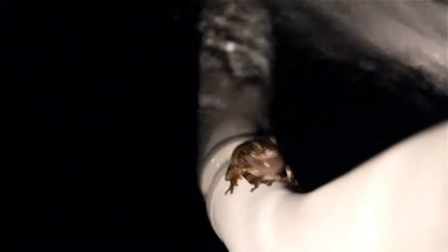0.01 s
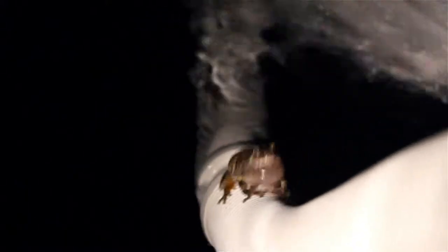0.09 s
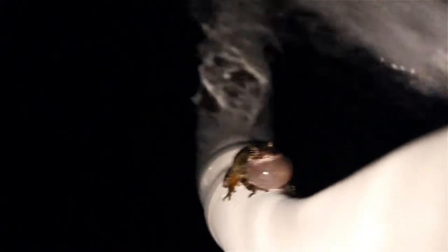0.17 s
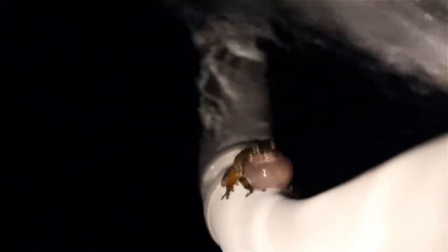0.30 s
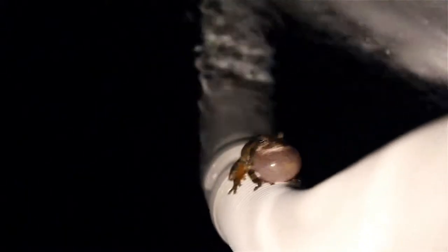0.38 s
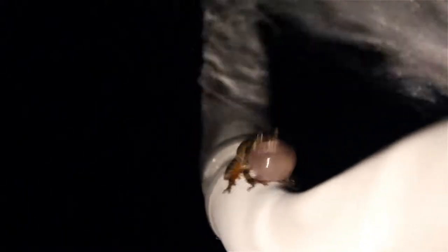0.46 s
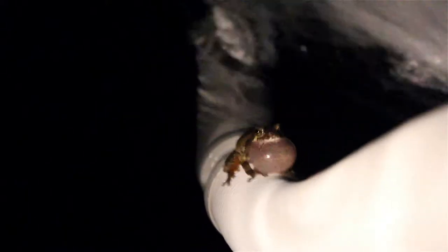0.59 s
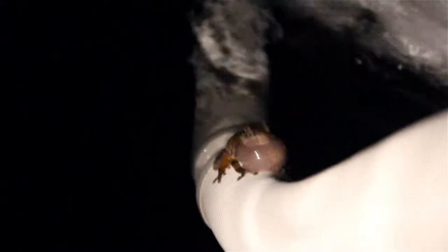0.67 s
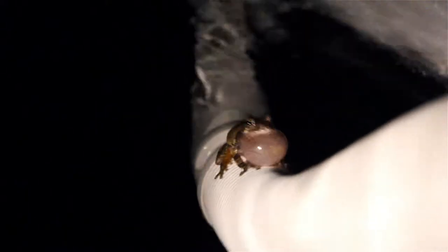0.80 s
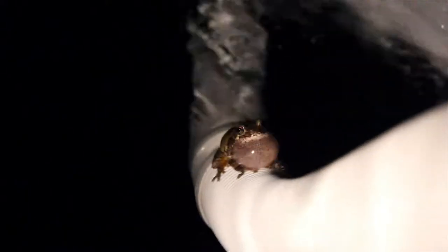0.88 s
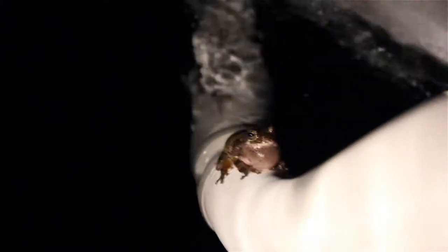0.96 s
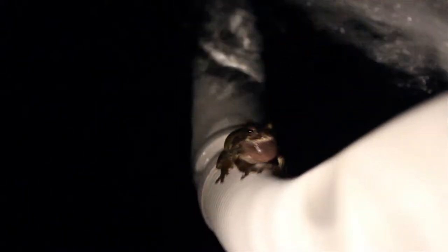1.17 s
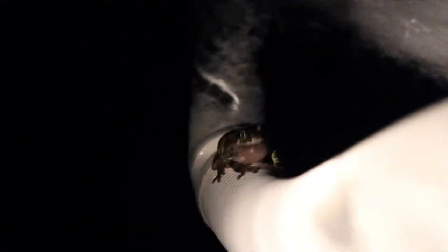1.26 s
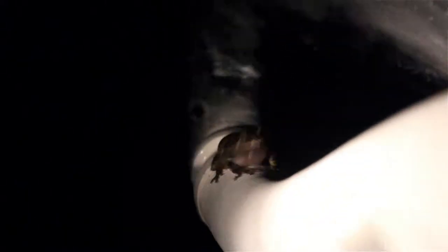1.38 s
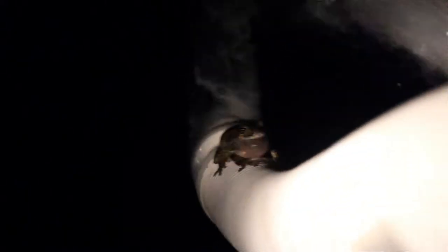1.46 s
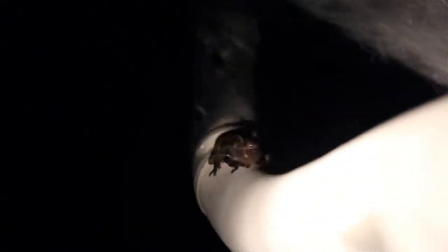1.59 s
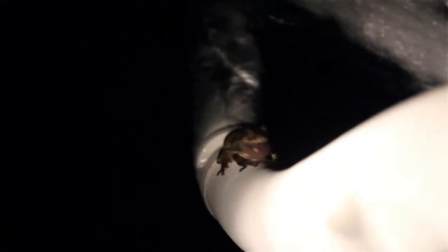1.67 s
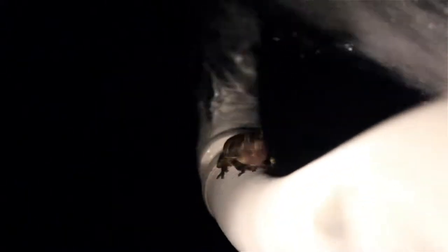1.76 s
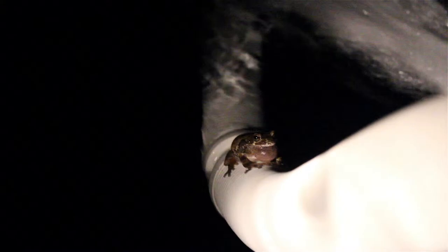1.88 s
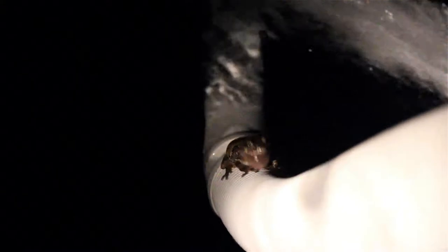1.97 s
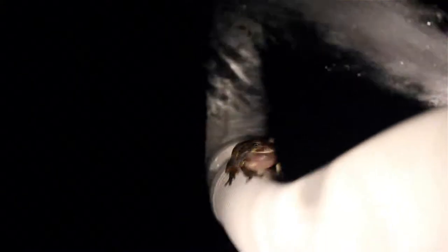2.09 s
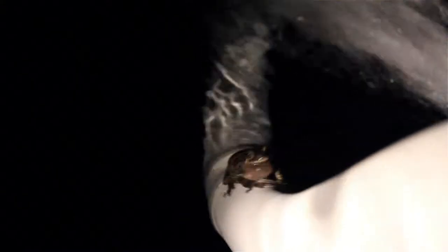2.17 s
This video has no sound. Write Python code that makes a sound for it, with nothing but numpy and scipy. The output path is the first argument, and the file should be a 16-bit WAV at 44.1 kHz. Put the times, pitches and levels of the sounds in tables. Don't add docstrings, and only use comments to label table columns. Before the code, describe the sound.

Two frogs give dry, buzzing, tonal trills that overlap for under a second, the nearer one louder and ending earlier; afterwards only bubbling water and a very faint low hum remain, outdoors, with little echo.

```python
import sys
import numpy as np
from scipy import signal
from scipy.fft import rfft, irfft
from scipy.io import wavfile
from scipy.ndimage import uniform_filter1d, map_coordinates

SR = 44100
rng = np.random.default_rng(int(sys.argv[2]) if len(sys.argv) > 2 else 0)


def wav_out(sig):
    wavfile.write(sys.argv[1], SR, np.round(np.clip(np.atleast_2d(sig).T, -1, 1) * 32767).astype(np.int16))


def amplitude_ratio(level_db):
    exponent = np.asarray(level_db, float) / 20
    return 10 ** exponent


N = 97020


def unit(x):
    return x / np.sqrt(np.mean(x ** 2) + 1e-20)


def wobble(rate):
    knots = rng.standard_normal(int(N * rate / SR) + 4)
    return map_coordinates(knots, [np.arange(N) * rate / SR])


def laid(start_s, rows):
    at = np.round(start_s * SR).astype(int)[:, None] + np.arange(rows.shape[1])
    return np.bincount(at.ravel(), rows.ravel(), N + SR)[:N]


# frequency in Hz, spectral level in dB.
RUSH_SPECTRUM = [(25, -21), (75, -8.5), (400, -4.5), (580, 0), (1650, 0.5), (3600, -4), (8000, -16),
                 (15800, -22.5)]


def rush():
    patchy_db, level_db, swell_db = 1.5, -39.5, 0.08
    _, _, z = signal.stft(rng.standard_normal(N + 512), SR, nperseg=512)
    field = uniform_filter1d(rng.standard_normal(z.shape), size=5, axis=0)
    field = uniform_filter1d(field, size=8, axis=1)
    patchy = signal.istft(z * amplitude_ratio(patchy_db * unit(field)), nperseg=512)[1][:N]
    f, tone_db = np.transpose(RUSH_SPECTRUM)
    log_hz = np.log(np.fft.rfftfreq(N, 1 / SR) + 1)
    shaped = irfft(rfft(patchy) * amplitude_ratio(np.interp(log_hz, np.log(f + 1), tone_db)), N)
    return amplitude_ratio(level_db + swell_db * (wobble(2.4) + wobble(11.7))) * unit(shaped)


def bubbles(s, db, hz, cycles):
    turns = np.arange(SR // 25) / SR * hz[:, None]
    life = turns / np.reshape(cycles, (-1, 1))
    swell = 2.43 * 3 * life * np.exp(-3 * life)
    ring = np.sin(2 * np.pi * turns * (1 + 0.034 * life))
    return laid(s, amplitude_ratio(db)[:, None] * swell * ring)


def swarm(hz, spread, db, tail_db, cycles, count):
    luck = rng.random((count, 4))
    normal = np.sqrt(-2 * np.log(luck[:, 1])) * np.cos(2 * np.pi * luck[:, 2])
    pitch = np.clip(hz * np.exp(spread * normal), 540, SR / 3)
    level_db = db + tail_db * np.minimum(-np.log(luck[:, 3]), 3)
    return bubbles(luck[:, 0] * N / SR, level_db, pitch, cycles)


# start in seconds, peak level in dB, pitch in Hz, ring in cycles.
SINGLE_DROPS = [(.037, -33.5, 694, 4.1), (1.131, -34, 552, 9.5), (1.1325, -32, 1490, 3.5),
                (1.134, -36, 2700, 6), (1.158, -31, 550, 11), (1.266, -34.5, 1410, 7.5),
                (1.345, -35, 1624, 13), (1.357, -38, 757, 12), (1.48, -31, 1480, 6.8),
                (1.762, -37, 539, 15), (1.765, -34, 750, 5.8), (2.072, -34, 3190, 12),
                (1.715, -32.5, 4020, 6.4), (1.462, -34, 7550, 7.5), (1.821, -31, 10000, 3),
                (1.859, -35, 5300, 6), (1.992, -32.5, 5460, 7.7), (2.003, -38, 9100, 9),
                (0.6145, -34, 14700, 12), (.6147, -42, 11800, 9), (.676, -43, 14600, 12),
                (.6335, -43, 14600, 12), (.634, -33, 6530, 2.7), (.6515, -38, 10500, 5),
                (.663, -42, 12500, 5), (.04, -47, 578, 18), (.2595, -40, 14400, 12), (.30, -42, 12500, 10),
                (1.8845, -40, 11600, 6), (1.7248, -41, 14300, 16), (1.9573, -45, 13800, 12),
                (2.0745, -43, 13700, 9), (2.19, -43, 13500, 8), (1.823, -38, 12500, 6),
                (.9265, -43, 10000, 8), (.553, -37, 6000, 8), (2.052, -39, 8500, 12)]


def water():
    round_bubbles = swarm(1200, spread=.55, db=-51, tail_db=2.2, cycles=10, count=400)
    fizz = swarm(5500, spread=.45, db=-49, tail_db=2.6, cycles=6, count=300)
    spit = swarm(11500, spread=.25, db=-54, tail_db=3.8, cycles=9, count=120)
    return rush() + bubbles(*np.transpose(SINGLE_DROPS)) + round_bubbles + fizz + spit


# frequency in Hz, level in dB rms.
HUM_TONES = [(120.3, -62), (292.6, -59), (358, -73), (422.6, -67), (219, -67)]


def hum():
    t = np.arange(N) / SR
    return sum(amplitude_ratio(db + 3 + 0.81 * wobble(7.9)) * np.sin(2 * np.pi * hz * t + .6 * wobble(8))
               for hz, db in HUM_TONES)


def train(knots, every):
    s, db = np.transpose(knots)
    index = np.arange(len(s))
    place = np.arange((len(s) - 1) * every + 1) / every
    return np.interp(place, index, s), np.interp(place, index, db)


def pulses(s, db, hz, glide, rise_s, fall_s, parts, air_db=-120, low_db=0):
    jitter_s, scatter_db, detune = .00025, .6, .007
    fullness = 1.05
    luck = rng.standard_normal((len(s), 7))
    t = np.arange(-SR // 50, SR // 50) / SR
    rises_s = rise_s * amplitude_ratio(0.35 * luck[:, 3:4])

    def shape(u):
        place = np.clip(np.where(u < 0, u / rises_s, u / fall_s), -1, 1)
        return np.abs(np.cos(np.pi / 2 * place)) ** fullness

    waver = uniform_filter1d(rng.standard_normal((len(s), len(t))), size=60, axis=1)
    waver = .1 * unit(waver)
    off_pitch = detune * luck[:, :1]
    phase = 2 * np.pi * hz * (1 + off_pitch) * (t + glide * t * t / 2) + 9 * luck[:, 4:5] + waver / 2
    tone = 0
    for k, part_db, lag_s in parts:
        level_db = part_db + 0.5 * luck[:, 5:6] * (k != 2) + np.reshape(low_db, (-1, 1)) * (k == 1)
        tone = tone + amplitude_ratio(level_db) * np.sin(k * phase) * shape(t - lag_s) ** (1 + (k > 2))

    whistle_phase = 2 * np.pi * 8520 * t * (1 + 2 * t + off_pitch / 2) + 4 * waver
    whistle = amplitude_ratio(-34 + luck[:, 6:]) * np.sin(whistle_phase) * shape((t + .001) / 1.3) ** 2
    hiss = uniform_filter1d(rng.standard_normal(tone.shape), size=5, axis=1)
    breath = amplitude_ratio(-24.5) * shape(t) * hiss
    air = amplitude_ratio(np.reshape(air_db, (-1, 1))) * (whistle + breath)
    level = amplitude_ratio(db + scatter_db * luck[:, 2])[:, None]
    return laid(s + t[0] + jitter_s * luck[:, 1], level * (tone + air))


def echoes(x, wet_db):
    t = np.arange(SR // 8) / SR
    tail = rng.standard_normal(len(t)) * amplitude_ratio(-60 * t / .035)
    return x + amplitude_ratio(wet_db) * signal.fftconvolve(x, tail / np.linalg.norm(tail))[:N]


# time in seconds, peak level in dB.
FAR_CALL = [
    (.071, -58),
    (.193, -27.5),
    (.3165, -19),
    (.443, -20),
    (.572, -21),
    (.704, -20.5),
    (.836, -20),
    (.9702, -20),
    (1.107, -19.5),
]
# multiple of the pitch, level in dB, lag in seconds.
FAR_HARMONICS = [(1, -16, .001), (2, 0, 0), (3, -32, 0)]
# time in seconds, level in dB.
SECOND_PULSE_LEVEL = [(.3, -3.5), (.4, -1)]


def far_frog():
    s, db = train(FAR_CALL, every=6)
    s[-1] += .0018
    fall_s = .0032
    first = pulses(s, db, 1198, glide=24, rise_s=.0059, fall_s=fall_s, parts=FAR_HARMONICS)
    second_db = db + np.interp(s, *np.transpose(SECOND_PULSE_LEVEL))
    second = pulses(s + .0089, second_db, 1176, glide=15, rise_s=.0052, fall_s=fall_s, parts=FAR_HARMONICS)
    gulp = pulses(s[:-1] + .0155, db[:-1] - 14, 1290, glide=0, rise_s=.003, fall_s=fall_s, parts=[(1, 0, 0)])
    return echoes(first + second + gulp, wet_db=-15)


# time in seconds, low mode level in dB, high mode level in dB.
SAC_LEVELS = [
    (.135, -52, -62),
    (.15, -41, -54),
    (.22, -36, -49),
    (.35, -40, -45),
    (1.118, -38, -44),
    (1.135, -55, -58),
]


def throat_sac():
    drift_rad, flutter_db = .8, 2
    t = np.arange(N) / SR
    s, *levels = np.transpose(SAC_LEVELS)
    ringing = 0
    for hz, db in zip((1207, 1400), levels):
        level_db = np.interp(t, s, db, left=-120, right=-120) + flutter_db * wobble(170)
        ringing = ringing + amplitude_ratio(level_db) * np.sin(2 * np.pi * hz * t + drift_rad * wobble(70))
    return ringing


# time in seconds, peak level in dB.
NEAR_CALL = [
    (.2748, -22.5),
    (.3526, -12.5),
    (.4338, -12.5),
    (.5151, -12.5),
    (.5988, -14),
    (.6814, -12),
    (.7654, -12.5),
    (.8494, -12),
    (.9348, -13),
]
# multiple of the pitch, level in dB, lag in seconds.
NEAR_HARMONICS = [(1, -8, .0006), (2, 0, 0), (3, -26, .0003), (4, -36, 0)]


def near_frog():
    s, db = train(NEAR_CALL, every=4)
    s[-1] += .007
    effort_db = db + 12.5
    call = pulses(s, db, 1268, glide=25, rise_s=.0055, fall_s=.0029, parts=NEAR_HARMONICS,
                  air_db=.7 * effort_db, low_db=-.55 * effort_db)
    return echoes(call, wet_db=-19)


def scene():
    return (water() + hum() + far_frog() + throat_sac() + near_frog())[None]


def low_pass(x):
    return signal.sosfilt(signal.butter(12, 16230, fs=SR, output="sos"), x)


def record(dry):
    hz = np.fft.rfftfreq(N, 1 / SR)
    response = (hz < 15740) * hz ** 2 / (hz ** 2 + 45 ** 2)
    mix = irfft(rfft(dry) * response, N)
    return low_pass(mix)


dry = scene()
out = record(dry)
wav_out(out)
```